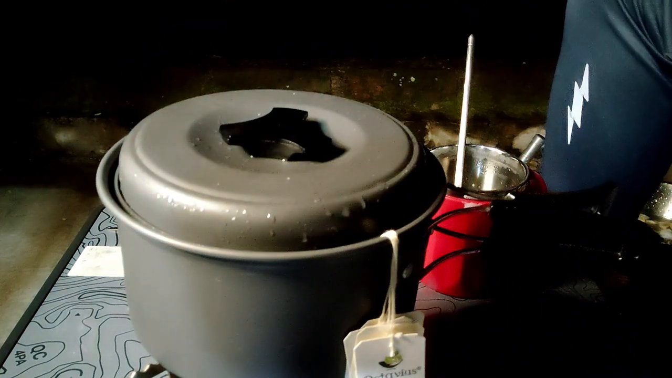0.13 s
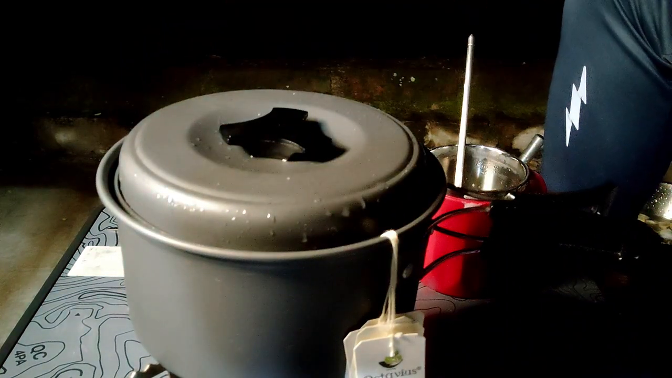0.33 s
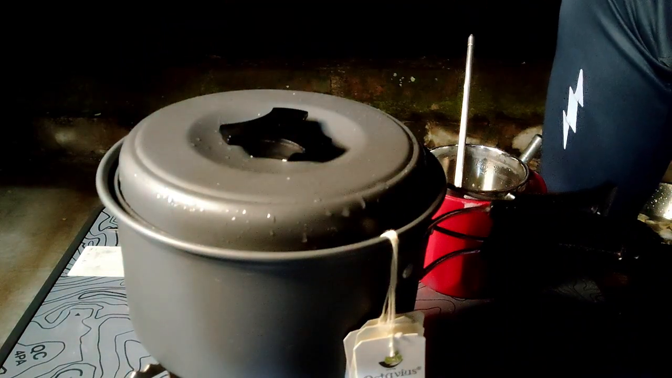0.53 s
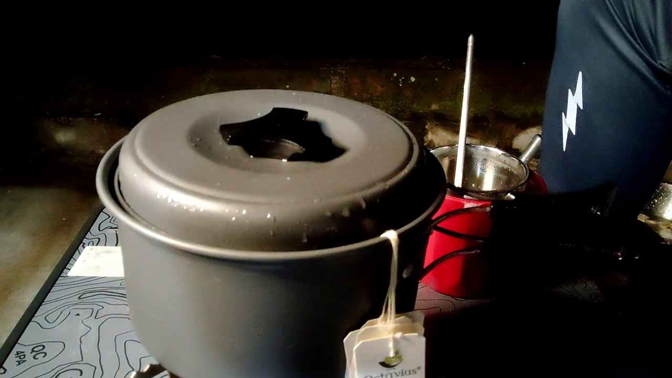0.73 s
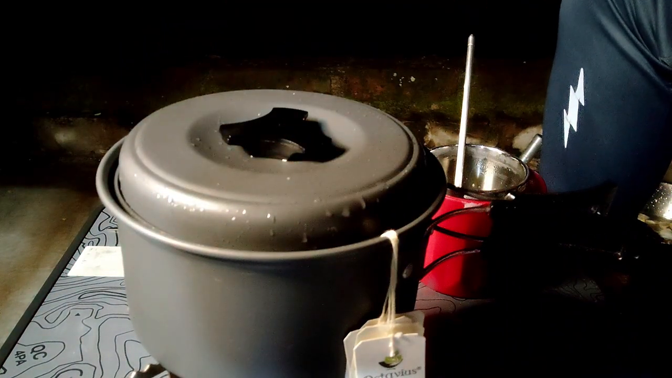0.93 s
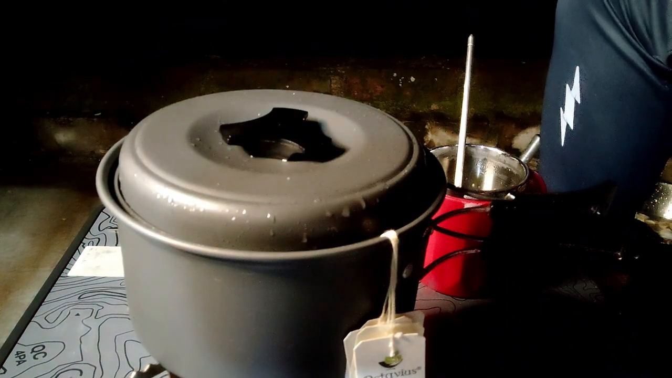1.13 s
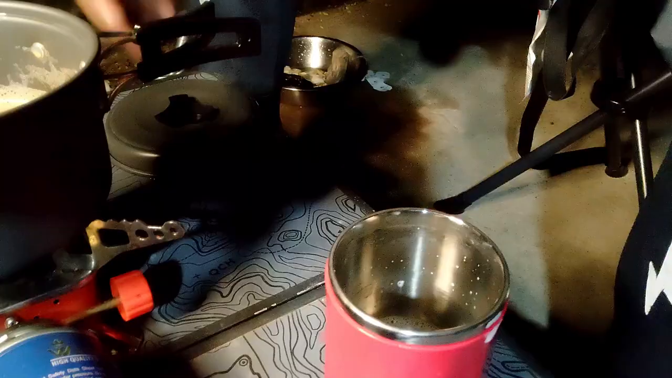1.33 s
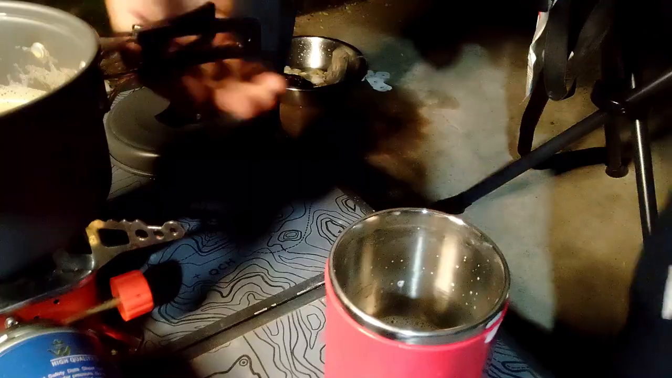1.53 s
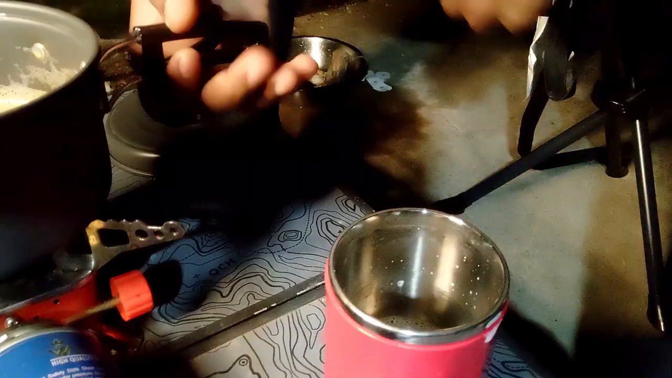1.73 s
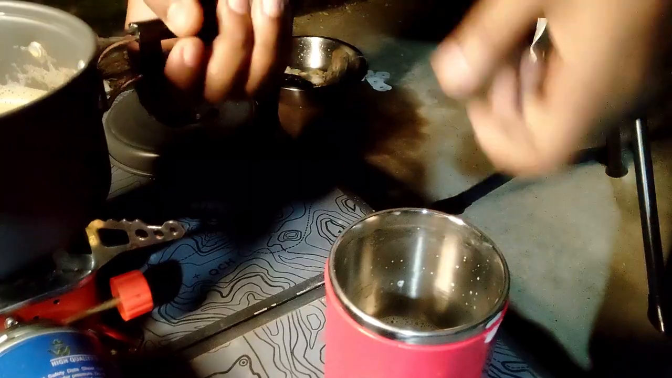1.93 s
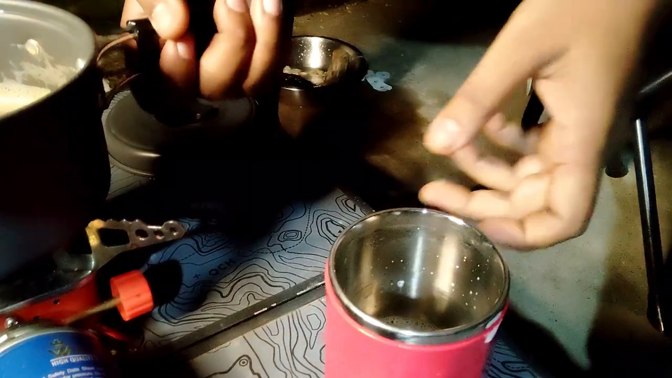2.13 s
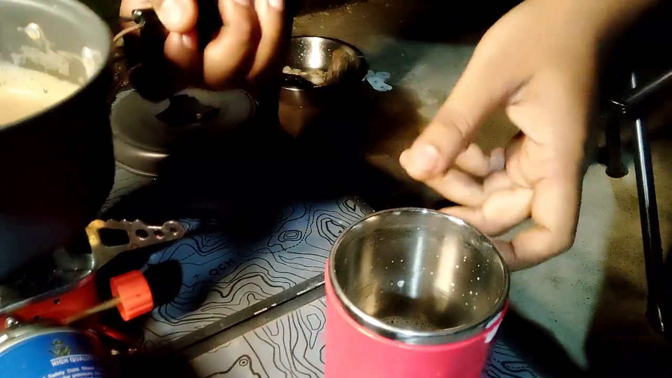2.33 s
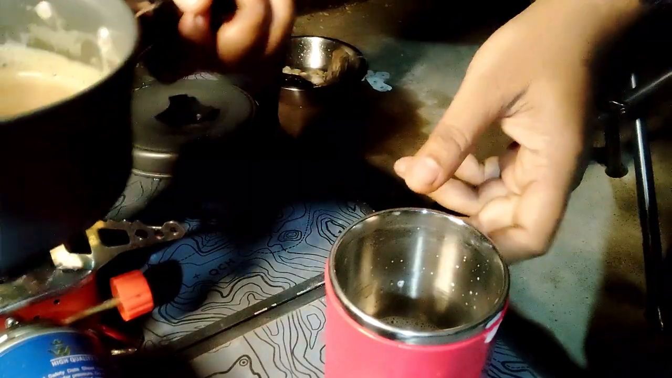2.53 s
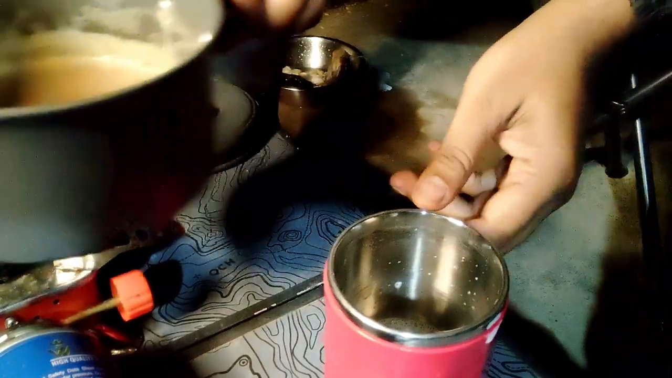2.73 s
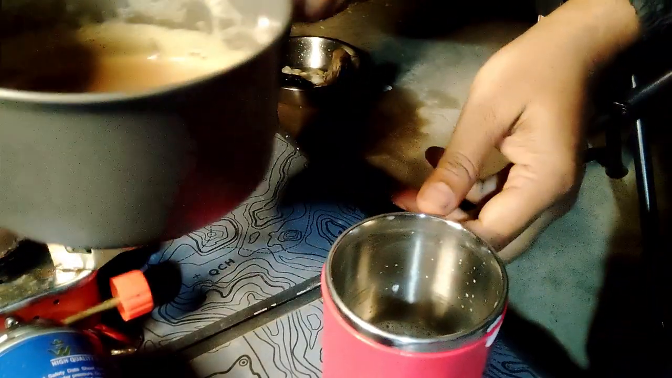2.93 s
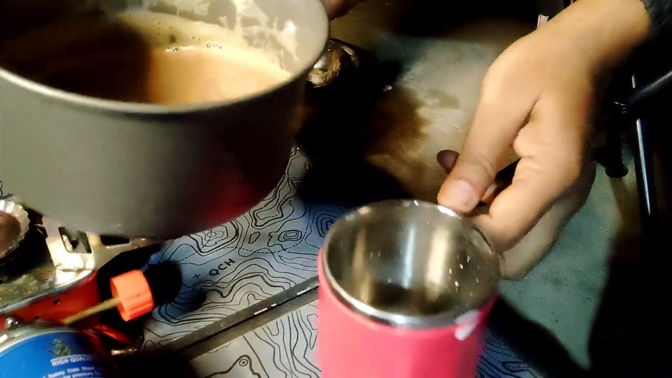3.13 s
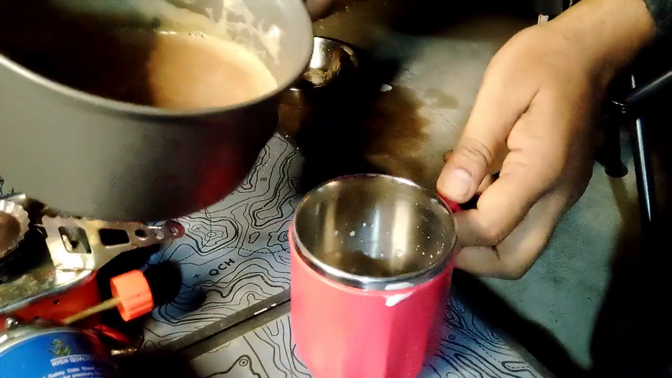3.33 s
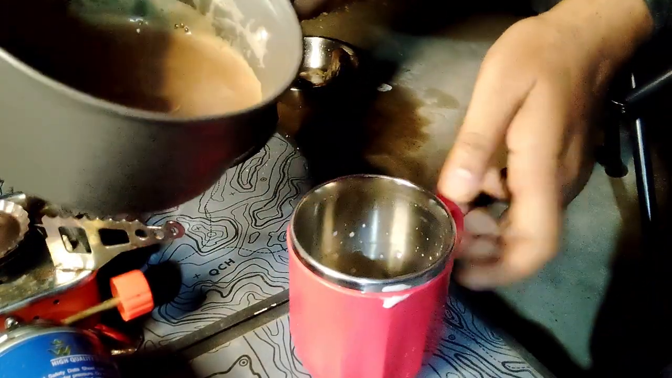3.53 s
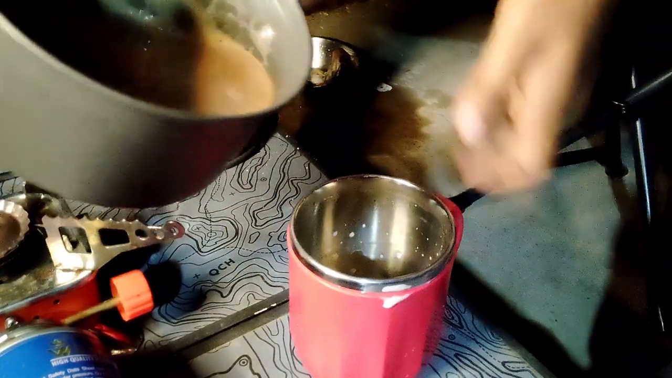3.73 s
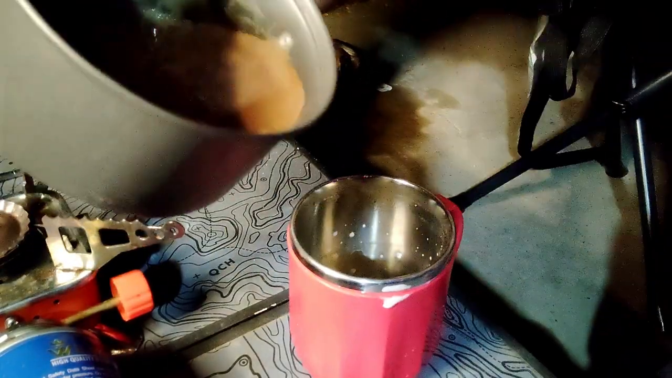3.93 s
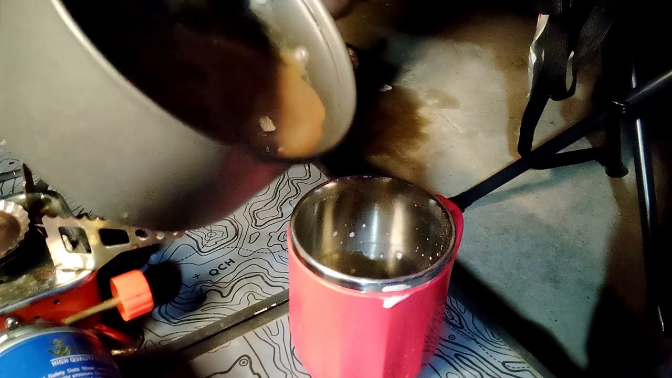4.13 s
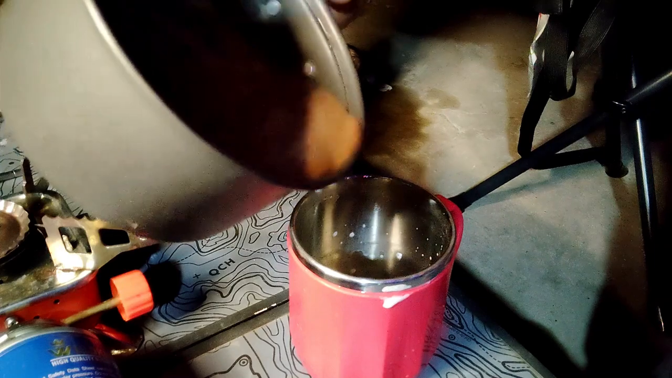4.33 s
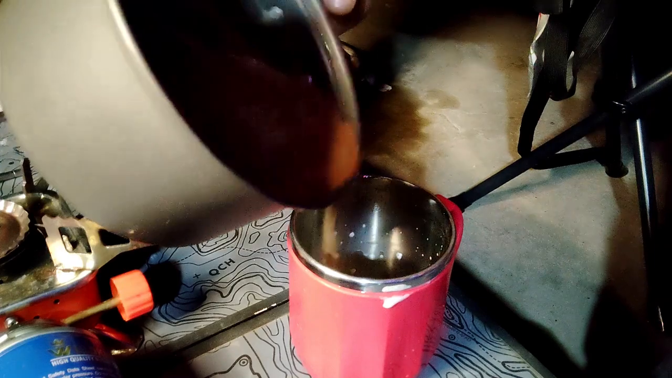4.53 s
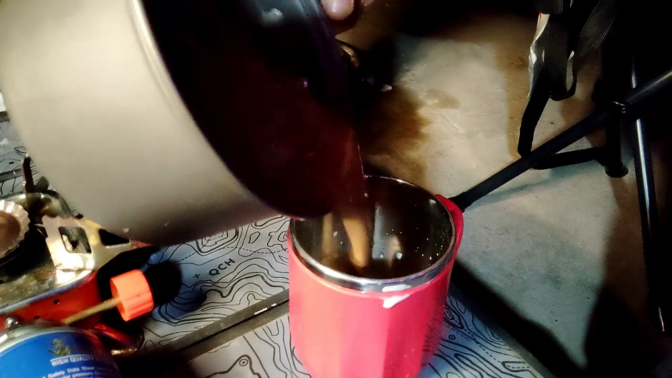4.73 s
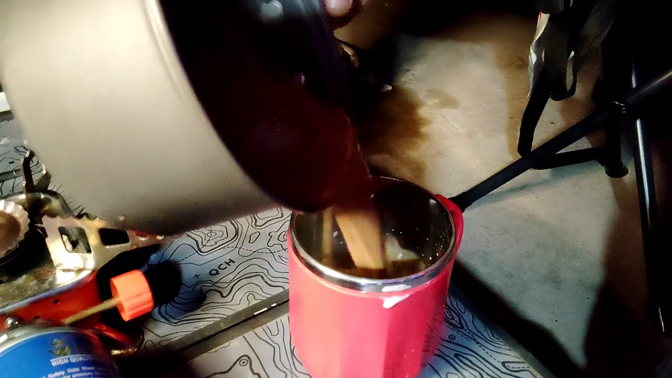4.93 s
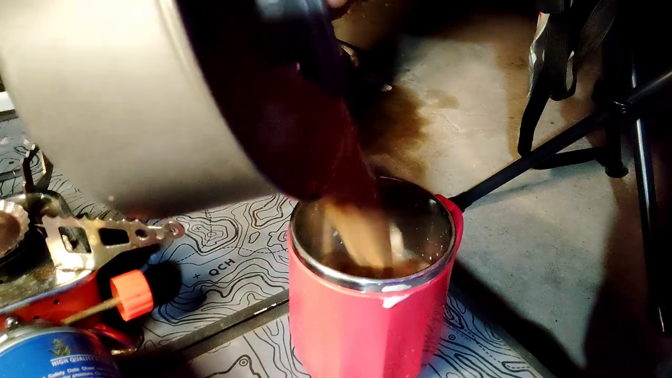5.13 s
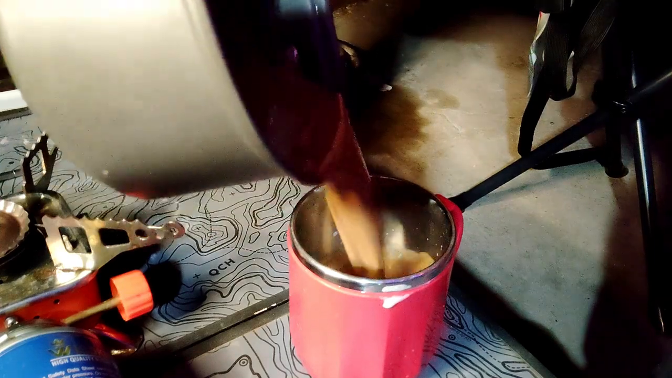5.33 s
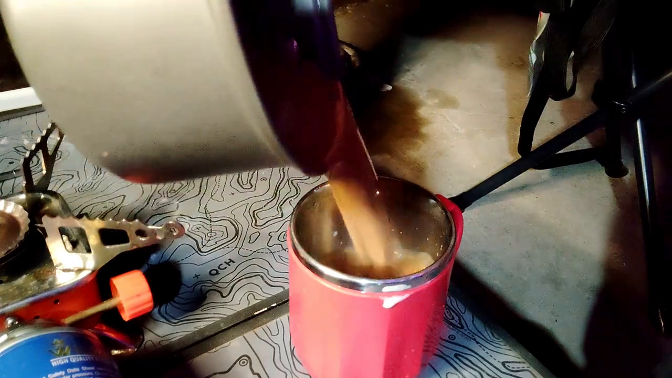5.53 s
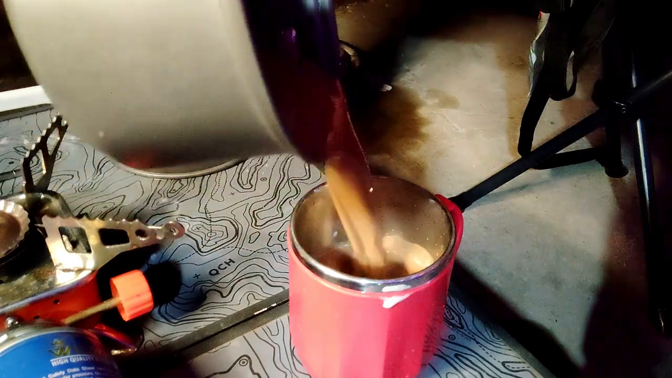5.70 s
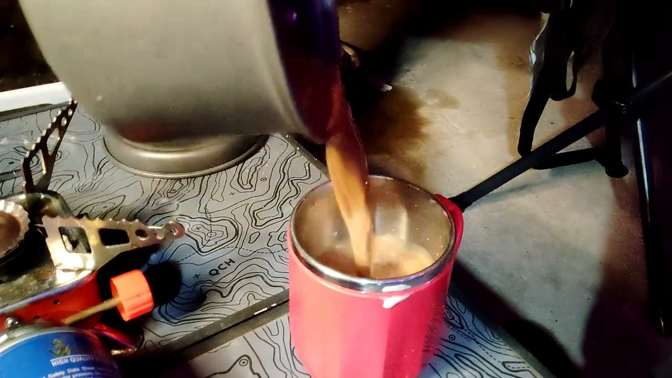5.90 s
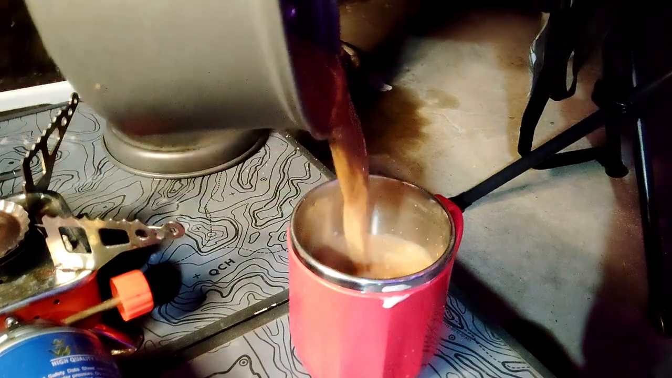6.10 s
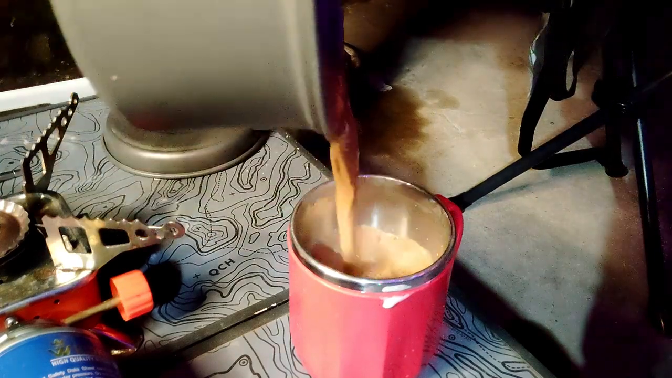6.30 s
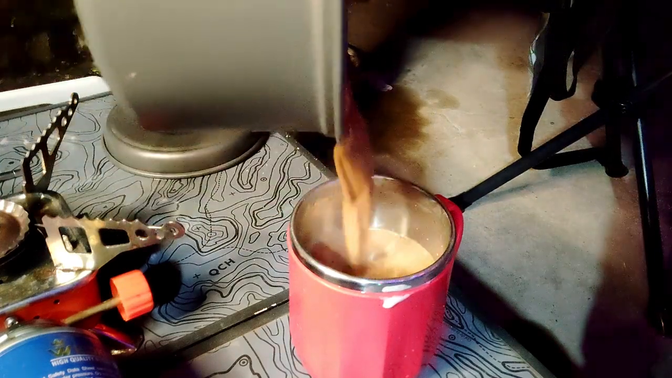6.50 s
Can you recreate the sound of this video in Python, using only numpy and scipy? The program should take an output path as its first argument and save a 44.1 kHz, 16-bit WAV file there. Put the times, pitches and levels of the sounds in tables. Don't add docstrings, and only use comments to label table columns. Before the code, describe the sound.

Soft fabric rubbing and distant insects cut to clanking cookware, a rough mug drag, and tea splashing into a ringing metal mug at camp.

```python
import sys
import numpy as np
from scipy import signal
from scipy.fft import rfft, irfft, next_fast_len
from scipy.io import wavfile
from scipy.ndimage import uniform_filter1d, minimum_filter1d, map_coordinates

SR = 44100
rng = np.random.default_rng(int(sys.argv[2]) if len(sys.argv) > 2 else 0)


def generate_wav(sig):
    pcm = np.round(np.clip(np.atleast_2d(sig).T, -1, 1) * 32767).astype(np.int16)
    wavfile.write(sys.argv[1], SR, pcm)


def volts_from_decibels(level):
    exponent = np.asarray(level, float) / 20
    return 10 ** exponent


N = 293706
TIME = np.arange(N) / SR

# start_s, level_db, upper_modes_db
SPLAT_HITS = [(4.717, -23.5, -14), (4.751, -25, -9.5), (4.837, -38.5, -5), (4.872, -34, -8),
              (4.924, -37.5, -23), (5.073, -42, -17), (5.114, -25.5, -24), (5.217, -33, -28),
              (5.282, -37, -36), (5.322, -25.5, -32), (5.454, -30.5, -28)]
# pitch_hz, level_db, t60_s
MUG_MODES = [(806.5, 8, 0.053), (866, -12, 0.075), (1320, -3, 0.23), (3020, -8, 0.1), (4050, -2.5, 0.09),
             (5520, 3, 0.041)]
# start_s, level_db
RIM_TICKS = [
    (3.407, -24.5),
    (3.441, -27),
    (4.68, -37.5),
    (4.7512, -30),
    (4.81, -37),
]
# start_s, level_db, pitch_hz
BUBBLE_POPS = [(4.8, -26, 4000), (4.807, -25, 3900), (4.942, -29, 3300), (4.954, -8, 2820),
               (4.974, -12.5, 2900), (5.0588, -18, 3650), (5.072, -16.5, 2560), (5.1122, -13, 3550),
               (5.154, -19, 3500), (5.173, -13, 3800), (5.2204, -16, 3600), (5.2536, -11.5, 4520),
               (5.3125, -18, 3400), (5.324, -11, 3500), (5.335, -8, 4700), (5.355, -10, 3340),
               (5.3688, -11, 3180), (5.4147, -15, 2980), (5.4543, -8, 3180), (5.6016, -14, 3040),
               (5.679, -12, 3570), (5.8613, -10.5, 4080), (5.8882, -16, 3800), (5.947, -10.5, 4050),
               (6.1027, -7.5, 3110), (6.1183, -12.5, 3350), (6.1407, -10.5, 3240), (6.168, -11.5, 3460),
               (6.2412, -13, 3530), (6.289, -14.5, 3820), (6.4647, -19, 3700)]
# start_s, level_db, pitch_hz
SMALL_BEADS = [(5.056, -23, 3730), (5.0981, -17, 3560), (5.1234, -18, 3550), (5.161, -15, 3870),
               (5.2154, -20, 3670), (5.3064, -15, 3440), (5.4263, -16, 3140), (5.4386, -18, 4460),
               (5.462, -10.5, 3270), (5.476, -32, 3100), (5.5456, -25, 2460), (5.6512, -21, 3160),
               (5.7022, -28, 3200), (5.7167, -21, 4250), (5.7591, -19, 3500), (5.779, -24, 3300),
               (5.7965, -28, 3330), (5.8083, -23.5, 2450), (5.8361, -27, 4500), (5.901, -22, 3270),
               (5.9232, -18, 3240), (5.9646, -16, 3230), (5.9965, -29, 3440), (6.0105, -24, 3210),
               (6.027, -25, 4240), (6.0469, -33, 3170), (6.0639, -20, 3310), (6.0895, -18.5, 3300),
               (6.1584, -17, 3410), (6.177, -23, 3940), (6.2036, -17.5, 3620), (6.2952, -23, 4180),
               (6.3198, -28, 3490), (6.3536, -22, 3400), (6.5135, -21, 3840), (6.5566, -22.5, 3760),
               (6.5867, -26, 3570), (6.6354, -27, 2620)]
# start_s, level_db, pitch_hz
LARGE_BLOBS = [(5.1552, -30, 1440), (5.3226, -33, 1310), (5.462, -26, 1710), (5.36, -37, 1330),
               (5.43, -39, 1270), (5.51, -31, 1440), (5.57, -32, 1610), (5.6, -36, 1320), (5.68, -35, 1400),
               (5.732, -33.5, 1150), (5.783, -25.5, 1290), (5.863, -28, 1630), (5.9243, -29, 1580),
               (6.102, -28, 1350), (6.151, -33, 1330), (6.175, -31, 1340), (6.243, -36, 1690),
               (6.321, -33, 1700), (6.5158, -31.5, 1390), (6.645, -32, 1600)]
# start_s, level_db, pitch_hz
AIR_GULPS = [(5.464, -30, 500), (5.508, -20.5, 425), (5.554, -29, 407), (5.734, -20, 215),
             (5.739, -26, 387), (5.785, -23.5, 338), (5.925, -31.5, 350), (6.163, -30.5, 292),
             (6.242, -37.5, 220), (6.516, -33.5, 300)]
# start_s, peak_db
DROPLET_SPRAYS = [(4.9532, -27), (4.9744, -17.5), (5.01, -33), (5.114, -36), (5.122, -28), (5.3102, -34.5),
                  (5.4537, -30), (5.57, -33.5), (5.6054, -33), (5.679, -32), (5.712, -30.5), (5.7562, -30),
                  (5.837, -32.5), (6.3157, -34), (6.456, -31.5)]
# freq_hz, density_db_per_hz
FIZZ_COLOUR = [(1290, -34), (2200, 17), (2490, 3), (2840, -14), (3090, 6), (3380, -7), (5500, 9),
               (6070, 4.5), (9790, -8.5), (13400, -5), (15800, -3)]
# freq_hz, width_hz, level_db
MUG_AIR_MODES = [(2370, 150, -6.5), (3350, 256, 2), (4250, 630, -1.5), (5800, 500, -0.5)]
# time_s, level_db
STREAM_FLOW = [
    (4.72, -56.5),
    (5.04, -54),
    (5.055, -38.5),
    (5.15, -33.5),
    (5.25, -38),
    (5.43, -33),
    (5.55, -42),
    (5.9, -35),
    (6.66, -46),
]
# peak_s, level_db
AIR_GURGLES = [
    (5.3, -36),
    (5.55, -49),
    (5.8, -40),
    (6.15, -40.5),
]
# peak_s, level_db
WALL_SLOSHES = [
    (5.35, -59),
    (5.52, -43.5),
    (5.95, -48),
    (6.15, -44),
    (6.66, -44),
]
# peak_s, level_db
HOLLOW_BOOMS = [
    (4.72, -36.5),
    (4.93, -42.5),
    (5.25, -40),
]
# time_s, level_db
WALL_NOTE = [(4.95, -52), (5.1, -46), (5.25, -40.5), (5.35, -40), (5.5, -50), (5.62, -50), (5.75, -41.5),
             (5.9, -52), (6.17, -46), (6.66, -51.5)]

# peak_s, rise_s, fall_s, table_db, mug_over_table_db
MUG_NUDGES = [
    (1.688, 0.0068, 0.15, -30, -5),
    (1.78, 0.033, 0.13, -30.5, 5),
    (1.87, 0.13, 0.15, -26, -31),
    (2.3, 0.51, 2, -38.5, -15),
    (2.954, 0.08, 0.074, -31.5, -7),
    (3.148, 0.17, 0.11, -43, 0.5),
    (3.198, 0.17, 0.13, -39, -24),
    (3.465, 0.041, 0.029, -52, -20),
    (3.53, 0.033, 0.028, -27, -16),
    (3.649, 0.078, 0.053, -33, -7),
]
# start_s, level_db, pitch_hz
TABLE_LURCHES = [
    (3.242, -13, 217),
    (3.262, -15, 256),
    (3.282, -28, 260),
    (3.296, -13.5, 235),
    (3.313, -17, 252),
    (3.334, -21, 253),
    (3.363, -16, 222),
    (3.395, -17, 218),
    (3.447, -16.5, 200),
    (3.52, -36, 243),
]
# freq_hz, width_hz, level_db
SLIDE_MODES = [(395, 47, 2.5), (532, 94, -0.5), (790, 114, 2.5), (1130, 120, -7), (1330, 108, 1.3),
               (1870, 240, -12.5), (2170, 480, -13.5), (5140, 1200, -16.5), (7600, 2500, -30),
               (12200, 1600, -32.5)]

# start_s, metal_db, table_db, body_db
POT_KNOCKS = [(0.1498, -33, -63, -70), (1.6791, -22.5, -33.5, -24.5), (1.7097, -24.5, -48, -36),
              (1.7503, -4.5, -17.5, -27), (1.756, -44, -26.5, -23), (1.8134, -18.5, -21.5, -18.5),
              (1.8186, -15, -23.5, -25), (1.8477, -25, -30, -45), (2.088, -33, -28, -22.5),
              (2.1046, -21.5, -50, -22), (3.4675, -25, -45, -46)]
# pitch_hz, level_db, t60_s
POT_MODES = [(1270, -6, 0.28), (1770, 8, 0.057), (2340, -34, 0.035), (3650, 0, 0.13), (4640, -27, 0.16),
             (5050, 10, 0.024), (7740, -21, 0.094), (8400, -32, 0.075)]
# freq_hz, width_hz, level_db
TABLE_MODES = [(204.4, 97, 2), (620, 130, -12), (1150, 24, -6), (1290, 23, -9), (1390, 15, -9)]
# time_s, slip_rate_hz, hum_db, overtone_db
POT_JUDDER = [
    [(2.035, 224.3, -34, -35), (2.045, 220.3, -23, -32), (2.105, 238, -16.5, -28.5)],
    [(2.115, 202, -24, -50), (2.141, 213, -20, -56), (2.16, 220, -35, -47)],
    [(2.3, 224.7, -50, -41.5), (2.38, 218.8, -27, -39), (2.47, 216, -42, -56)],
]
# freq_hz, width_hz, level_db
POT_BASE_MODES = [(496, 90, 1.7), (710, 90, -4.5), (910, 42, -9), (1187, 66, -2.5), (1840, 300, -1.5)]
# pitch_hz, level_db, t60_s
SHELL_RINGS = [(1170, -29, .1), (895, -27, .09), (1753, -30, .12), (748, -28, 0.23), (695, -29.5, 0.21),
               (1370, -36, .45)]
SHELL_RING_S = [2.06, 2.086, 2.105, 2.108, 2.335, 4.745]

# start_s, low_db, knock_db
HAND_THUDS = [
    (0.148, -49, -37),
    (0.915, -38, -37),
    (1.195, -41, -33),
    (1.228, -25.5, -24.5),
    (1.27, -23.5, -32.5),
    (1.539, -47, -52),
    (3.644, -33, -41),
    (3.997, -45, -41),
]
# start_s, level_db
INSECT_CHIRPS = [(1.7125, -22), (2.0444, -34), (2.0717, -33), (2.2383, -43), (2.2692, -34), (2.2982, -33),
                 (2.4892, -33.5), (2.52, -33), (2.9, -36)]
# peak_s, rise_s, fall_s, bright_db, dull_over_bright_db
CLOTH_MOVES = [
    (0, .1, 1.3, -43.5, -7.5),
    (.45, 0.072, 0.039, -38.5, -0.5),
    (.8, 0.46, 0.49, -39, -8),
    (0.999, 0.35, 0.59, -37.5, -4.5),
    (1.56, 0.013, 3, -45.5, -36),
    (1.7, 0.12, 0.56, -41, -30),
    (2.1, 0.28, 0.13, -45.5, 10),
    (2.4, 0.23, 4, -47.5, -4.5),
    (3.58, 0.051, 0.84, -47.5, -26),
    (3.98, 0.51, 0.12, -53.5, 2),
]
# freq_hz, density_db_per_hz
CLOTH_COLOUR = [(1350, -30), (2300, -0.5), (3700, -4), (4950, -3), (5630, -11.5), (8770, -24),
                (9820, -28.5), (12900, -21), (15800, -23)]
# time_s, pitch_hz, level_db
FABRIC_WHISTLE = [
    (.93, 2270, -37),
    (1.0, 2900, -42),
    (1.03, 3500, -29.5),
    (1.05, 3520, -47),
]
# peak_s, rise_s, fall_s, level_db
FABRIC_RUBS = [
    (1.565, 0.013, 0.19, -30.5),
    (2.75, 0.14, 0.22, -42),
    (3.58, 0.017, 0.04, -35),
]
# freq_hz, density_db_per_hz
AIR_COLOUR = [(15, -53), (25, -7.5), (102, -4), (394, -12.5), (489, -16), (1440, -26.5), (1940, 2.5),
              (2690, -33), (5140, -13), (5880, -20), (6380, -45), (7110, -21.5), (8140, -47),
              (13200, -28.5), (16000, -29)]
# freq_hz, width_hz, level_db
INSECT_BAND = [(1829, 150, 4.5), (2058, 138, 4)]

# freq_hz, t60_s
YARD_DECAY = [(200, 0.27), (2000, 0.1), (10000, 0.036)]
# freq_hz, likeness
AIR_LIKENESS = [(35, 0.01), (110, 0.87), (380, 0.04), (2400, 0.089), (15000, 0)]
# freq_hz, left_minus_right_db
PORT_COLOUR = [(300, 0), (1300, 1), (2400, 3.5), (4400, 7), (6300, -7), (8100, -19.5), (11000, -4),
               (15000, -3)]
# freq_hz, share_dropped
MUTED_BANDS = [(2500, 0), (4700, .08), (5900, .34), (7000, .2), (9800, .65), (12000, .33), (14500, .5),
               (15700, 1)]

AIR_DB, LOW_AIR_DB = -55.5, -48
INSECT_DB, INSECT_SWELL_DB_PER_S, INSECT_AFTER_DB = -49, 4, -47.5
CUT_S, GAP_S, FADE_FROM_DB, FADE_S = 1.336, 0.06, -18, 0.18
SCRAPE_S, SCRAPE_DB, SCRAPE_SAG_DB_PER_S = (3.238, 3.49), (-26, -24), (14, 10.5)
COLUMN_DB, COLUMN_SAG_DB_PER_S = -9, 19
EMPTY_HZ, WET_S, LOAD_PER_S = 783, 5.08, 3.36


def unit(x):
    return x / np.sqrt(np.mean(x ** 2) + 1e-20)


def along(points, hz):
    f, v = np.transpose(points)
    return np.interp(np.log(hz + 1), np.log(f + 1), v)


def curves(rows):
    s, *columns = np.transpose(rows)
    return [np.interp(TIME, s, column) for column in columns]


def inside(rows, fade=0.0019):
    return np.clip(np.minimum(TIME - rows[0][0], rows[-1][0] - TIME) / fade, 0, 1)


def noise():
    return rng.standard_normal(N)


def wobble(rate):
    return map_coordinates(rng.standard_normal(int(N * rate / SR) + 4), [TIME * rate])


def grit(rough_db, rate):
    return noise() * volts_from_decibels(rough_db * wobble(rate))


def tone(hz):
    return np.sin(2 * np.pi * np.cumsum(hz) / SR)


def filtered(x, response):
    m = next_fast_len(N + SR // 2)
    return irfft(rfft(x, m) * response(np.fft.rfftfreq(m, 1 / SR)), m)[..., :N]


def resonant(x, peaks):
    def response(f):
        total = 0
        for k, (centre, width, db) in enumerate(peaks):
            damping = 1j * f * width
            total = total + (-1) ** k * volts_from_decibels(db) * damping / (centre * centre - f * f + damping)
        return total
    return filtered(x, response)


def pings(s, hz, db, t60, rise=0., attack=0.0001):
    s, hz, db, t60 = [np.ravel(v)[:, None] for v in np.broadcast_arrays(s, hz, db, t60)]
    t = np.arange(int(t60.max() * SR) + 1) / SR
    envelope = volts_from_decibels(db - 60 * t / t60) * (1 - np.exp(-t / attack))
    wave = envelope * np.sin(2 * np.pi * hz * t * (1 + rise * np.minimum(t / t60, 1)))
    at = (s * SR).astype(int) + np.arange(len(t))
    return np.bincount(at.ravel(), wave.ravel(), N + SR)[:N]


def bursts(s, db, t60, attack=0.0037):
    kicks = np.bincount((np.asarray(s) * SR).astype(int), volts_from_decibels(db), N)[:N]
    t = TIME[:SR // 4]
    return signal.fftconvolve(kicks, volts_from_decibels(-60 * t / t60) * (1 - np.exp(-t / attack)))[:N]


def swells(s, rise, fall, db):
    out = 0
    for at, up, down, top_db in zip(*np.broadcast_arrays(s, rise, fall, db)):
        out = out + volts_from_decibels(top_db - 20 * np.maximum((at - TIME) / up, (TIME - at) / down))
    return out


def swarm(count, hz, cycles, scatter_db):
    chance = rng.random((count, 3))
    start_s = STREAM_FLOW[0][0]
    s = start_s + chance[:, 0] * (N / SR - start_s)
    pitch = hz(s, chance[:, 1])
    db = -scatter_db * np.log(np.maximum(chance[:, 2], 1 / 20))
    sound = pings(s, pitch, db, cycles / pitch, rise=0.12, attack=0.00022)
    return sound / sound[-SR:].std()


def spread(colour):
    def mid_side(f):
        turn = np.arccos(np.clip(along(AIR_LIKENESS, f), -1, 1)) / 2
        return colour(f) * [np.cos(turn), np.sin(turn)]
    mid, side = filtered(rng.standard_normal((2, N)), mid_side)
    return np.array([mid + side, mid - side])


def placed(x, pan_db, lag, wet_db):
    half = np.array([[1], [-1]]) / 2

    def path(f):
        shadow = volts_from_decibels(half * pan_db * f * f / (f * f + 1200 ** 2))
        return shadow * np.exp(-2j * np.pi * f * half * lag / SR)
    direct = filtered(x, path)
    hz, t, z = signal.stft(rng.standard_normal((2, SR // 4)), SR, nperseg=256)
    tail = signal.istft(z * volts_from_decibels(-60 * t / along(YARD_DECAY, hz)[:, None]), SR, nperseg=256)[1]
    echo = signal.fftconvolve(direct, tail / np.linalg.norm(tail[0]), axes=1)[:, :N]
    return direct + volts_from_decibels(wet_db) * filtered(echo, lambda f: f * f / (f * f + 550 ** 2))


def splats():
    s, db, upper_db = np.transpose(SPLAT_HITS)
    hz, level_db, t60 = np.transpose(MUG_MODES)
    upper = upper_db[:, None] * (hz > 1000)
    ring = pings(s[:, None], hz, db[:, None] + level_db + upper, t60, rise=-0.025, attack=0.0023)
    rim = unit(resonant(noise(), [(7100, 2500, -2.5), (12700, 1900, 1)]))
    return ring + 1.3 * rim * bursts(*np.transpose(RIM_TICKS), 0.015, attack=0.00057)


def bubbles():
    s, db, hz = np.transpose(BUBBLE_POPS)
    mates = rng.normal(0, 1, (len(s), 3, 2))
    mate_s = s[:, None] + 0.0031 * np.abs(mates[..., 0])
    mate_hz = hz[:, None] * volts_from_decibels(2.5 * np.tanh(mates[..., 1]))
    train = pings(mate_s, mate_hz, db[:, None] - 8, 24 / hz[:, None], rise=0.13)
    pop = pings(s, hz, db + 0.5, 20 / hz, rise=0.13, attack=0.0002)
    s, db, hz = np.transpose(SMALL_BEADS)
    bead = pings(s, hz, db + 5.5, 22 / hz, rise=0.068, attack=0.00048)
    s, db, hz = np.transpose(LARGE_BLOBS)
    blob = pings(s, hz, db + 8.0, 30 / hz, rise=0.1, attack=0.00071)
    return 0.81 * (pop + train + bead) + blob + film_snaps()


def film_snaps():
    gulp_s, gulp_db, _ = np.transpose(AIR_GULPS)
    bead_s, bead_db, _ = np.transpose(SMALL_BEADS)
    db = np.r_[gulp_db + 3.5, bead_db + 2.5]
    snap = pings(np.r_[gulp_s, bead_s], 4900, db, 0.0012, attack=0.00005)
    return 1.85 * resonant(snap, MUG_AIR_MODES) + 0.26 * snap


def gulps():
    s, db, hz = np.transpose(AIR_GULPS)
    slap = bursts(s, db - 10, 0.092) * unit(resonant(noise(), [(560, 180, 0)]))
    return slap + pings(s, hz, db + 6.5, 11 / hz, rise=0.046, attack=0.0021)


def spray():
    def colour(f):
        return volts_from_decibels(along(FIZZ_COLOUR, f) / 2) * (f > 4000) * (1 + (f > 10500))
    puffs = bursts(*np.transpose(DROPLET_SPRAYS), 0.011, attack=0.00036)
    return volts_from_decibels(8.0) * puffs * unit(filtered(noise(), colour))


def flow():
    return inside(STREAM_FLOW) * volts_from_decibels(curves(STREAM_FLOW)[0])


def stream():
    small = swarm(count=2600, hz=lambda s, u: 2300 * 2 ** (1.4 * u), cycles=22, scatter_db=2.4)
    small = unit(resonant(small, MUG_AIR_MODES))
    plops = swarm(count=260, hz=lambda s, u: 380 * 2 ** (2.18 * u), cycles=14, scatter_db=2.0)
    hiss = unit(filtered(grit(1.8, 150), lambda f: volts_from_decibels(along(FIZZ_COLOUR, f)) * (f > 2200)))
    return flow() * volts_from_decibels(2.6 * wobble(30)) * (0.33 * small + 0.083 * plops + 0.39 * hiss)


def wall_hz(s):
    return EMPTY_HZ / np.sqrt(1 + (LOAD_PER_S * np.maximum(s - WET_S, 0)) ** 1.364)


def sinking_wall():
    level = inside(WALL_NOTE) * volts_from_decibels(curves(WALL_NOTE)[0] - 2 + 6 * wobble(28))
    return level * tone(wall_hz(TIME) * (1 + .05 * wobble(30)))


def gurgles():
    s, db = np.transpose(AIR_GURGLES)
    near_wall = swarm(count=340, hz=lambda s, u: wall_hz(s) * 2 ** (0.25 * u - .15), cycles=16.0, scatter_db=3.0)
    return swells(s, 0.2, 0.38, db) * near_wall


def sloshes():
    s, db = np.transpose(WALL_SLOSHES)
    rim = unit(resonant(grit(2.6, 70), [(800, 700, -7), (1340, 130, 6), (1700, 310, 1.8)]))
    return (swells(s, 0.21, 0.24, db) + volts_from_decibels(-14) * flow()) * rim


def hollow_mug():
    s, db = np.transpose(HOLLOW_BOOMS)
    column = unit(resonant(resonant(grit(3, 50), [(788, 70, -4.0), (920, 91, -5.5)]), [(810, 500, 0)]))
    drum = unit(resonant(grit(7.5, 30), [(204, 33, 0)]))
    filling = volts_from_decibels(COLUMN_DB - COLUMN_SAG_DB_PER_S * np.maximum(TIME - s[-1], 0))
    hollow = swells(s, 0.012, 0.14, db) + flow() * filling
    return hollow * column + (0.34 * hollow + 0.2 * flow()) * drum


def drag():
    table = unit(resonant(resonant(grit(2.34, 70), [(209.0, 65, 13.0), (293, 300, -11)]), [(239, 250, 0)]))
    shell = unit(resonant(grit(1.7, 130), SLIDE_MODES))
    s, rise, fall, db, mug_db = np.transpose(MUG_NUDGES)
    sag_db = np.outer(SCRAPE_SAG_DB_PER_S, TIME - SCRAPE_S[0]).clip(0)
    table_pull, mug_pull = inside(np.transpose([SCRAPE_S])) * volts_from_decibels(np.transpose([SCRAPE_DB]) - sag_db)
    table_level = swells(s, rise, fall, db + 1.0) + table_pull
    mug_level = swells(s, rise, fall, db + mug_db) + mug_pull
    return table_level * table + mug_level * shell


def lurches():
    s, db, hz = np.transpose(TABLE_LURCHES)
    return pings(s, hz, db + 6.5, 0.067, attack=0.0022)


def knocks():
    s, metal_db, table_db, body_db = np.transpose(POT_KNOCKS)
    hz, level_db, t60 = np.transpose(POT_MODES)
    scatter = rng.normal(0, 3, (len(s), len(hz)))
    ring = pings(s[:, None], hz, metal_db[:, None] + level_db - 7 + scatter, 0.25 * t60)
    crack = unit(filtered(noise(), lambda f: f / (1 + (f / 2500) ** 2.91) + 90 * (f > 10500)))
    thump = unit(resonant(noise(), TABLE_MODES[:2]))
    body = unit(resonant(noise(), [(733, 18, 9.5), (940, 150, -2.5), (1190, 170, -3.0)]))
    sound = ring + crack * bursts(s, metal_db + 9.5, 0.019)
    return sound + thump * bursts(s, table_db + 7.5, 0.075) + body * bursts(s, body_db - 0.5, 0.1)


def judder():
    out = 0
    for rows in POT_JUDDER:
        slip_hz, hum_db, over_db = curves(rows)
        turn = 2 * np.pi * np.cumsum(slip_hz * (1 + 0.0292 * wobble(60))) / SR
        slips = np.exp(4 * np.cos(turn)) * (1 + 3.0 * noise())
        hum = volts_from_decibels(hum_db + 5.0) * np.sin(turn)
        overtones = volts_from_decibels(over_db + 1.5) * unit(resonant(slips, POT_BASE_MODES))
        out = out + inside(rows) * (hum + overtones)
    return out


def rings():
    hz, db, t60 = np.transpose(SHELL_RINGS)
    return pings(SHELL_RING_S, hz, db, t60, rise=-0.032, attack=0.0037) * volts_from_decibels(2.2 * wobble(45))


def thuds():
    s, low_db, knock_db = np.transpose(HAND_THUDS)
    low = pings(s[:, None], [85, 150], low_db[:, None] + [1.5, -2.5], 0.1, attack=0.0017)
    knock = unit(resonant(resonant(noise(), [(298, 146, 13), (660, 340, 3)]), [(500, 2000, 0)]))
    return low + knock * bursts(s, knock_db + 10.5, 0.043)


def rustle():
    bright = spread(lambda f: volts_from_decibels(along(CLOTH_COLOUR, f)) * (f > 2300))
    bright = unit(bright * volts_from_decibels(0.81 * wobble(90)))
    dull = unit(spread(lambda f: f / (1 + (f / 1300) ** 4)) * volts_from_decibels(2.8 * wobble(50)))
    hz, db = curves(FABRIC_WHISTLE)
    whistle = inside(FABRIC_WHISTLE) * volts_from_decibels(db) * wobble(140) * tone(hz)
    rub = unit(resonant(spread(np.ones_like), [(3800, 370, -12.5), (4700, 190, -5)]))
    rub = swells(*np.transpose(FABRIC_RUBS)) * rub
    s, rise, fall, db, dull_db = np.transpose(CLOTH_MOVES)
    return whistle + rub + swells(s, rise, fall, db + 1.0) * bright + swells(s, rise, fall, db + dull_db) * dull


def near_insect():
    s, db = np.transpose(INSECT_CHIRPS)
    return pings(s, 5130, db + 13.5, 0.012, attack=0.0018)


def night():
    air = volts_from_decibels(AIR_DB + 15.5) * unit(spread(lambda f: volts_from_decibels(along(AIR_COLOUR, f)) * (f > 300)))
    low_db = LOW_AIR_DB + 3.0 + 0.94 * np.array([wobble(3.84), wobble(9.3)])
    low = volts_from_decibels(low_db) * unit(spread(lambda f: volts_from_decibels(along(AIR_COLOUR, f)) * (f <= 300)))
    insect_db = np.where(TIME < CUT_S, INSECT_DB + INSECT_SWELL_DB_PER_S * TIME, INSECT_AFTER_DB)
    band = resonant(resonant(spread(np.ones_like), INSECT_BAND), [(1940, 590, 0)])
    return air + low + volts_from_decibels(insect_db + 4 + 3.3 * wobble(25)) * unit(band)


def scene_change():
    back = TIME - CUT_S - GAP_S
    return (TIME < CUT_S) + (back > 0) * volts_from_decibels(FADE_FROM_DB * np.clip(1 - back / FADE_S, 0, 1))


def scene():
    pour = splats() + bubbles() + gulps() + spray() + stream()
    pour = pour + sinking_wall() + gurgles() + sloshes() + hollow_mug()
    tea = placed(pour, 8.6, -1.29, -10.5)
    mug = placed(drag() + lurches(), -0.21, 2.5, -4.5)
    pot = placed(knocks() + judder() + rings() + thuds() + near_insect(), 4.8, 6.33, 0)
    return (tea + mug + pot + rustle() + night()) * scene_change()


def gated(x):
    lead = 651
    hz, t, z = signal.stft(np.pad(x, ((0, 0), (lead, 0))), SR, "cosine", nperseg=2048)
    whim = rng.random((len(hz) // 6 + 1, len(t) // 2 + 1))
    whim = np.kron(whim, np.ones((6, 2)))[:len(hz), :len(t)]
    power = uniform_filter1d(np.mean(np.abs(z) ** 2, axis=0), size=120, axis=0)
    level_db = 10 * np.log10(power + 1e-16)
    sudden = level_db > minimum_filter1d(level_db, size=7, axis=1) + 9
    keep = sudden | (whim > along(MUTED_BANDS, hz)[:, None])
    return signal.istft(z * keep, SR, "cosine", nperseg=2048)[1][:, lead:][:, :N]


def low_pass(x):
    return signal.sosfilt(signal.butter(12, 16650, fs=SR, output="sos"), x)


def record(dry):
    def port(f):
        tilt = volts_from_decibels(np.array([[.5], [-.5]]) * along(PORT_COLOUR, f))
        return tilt / (1 + (f / 15900) ** 60)
    mix = gated(1.03 * np.tanh(filtered(dry, port) / 1.587))
    return low_pass(mix)


dry = scene()
out = record(dry)
generate_wav(out)
```